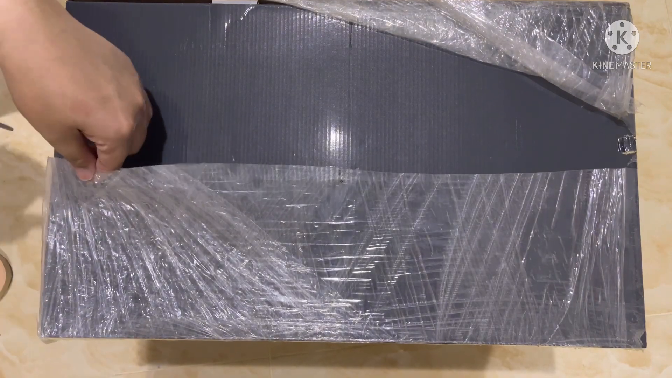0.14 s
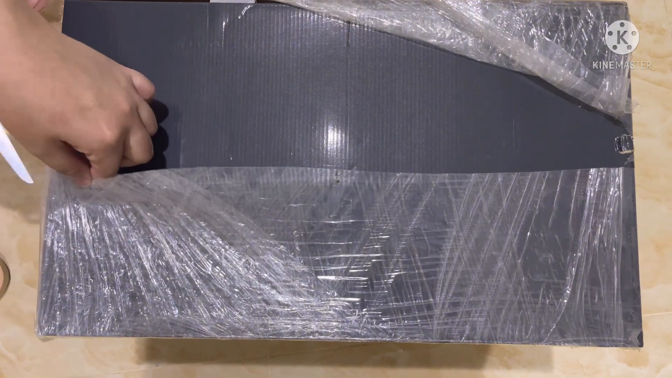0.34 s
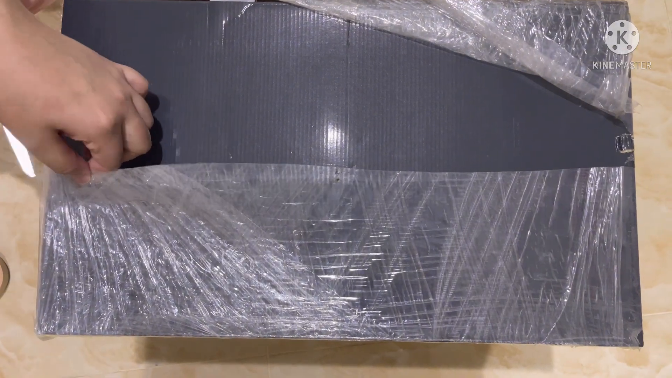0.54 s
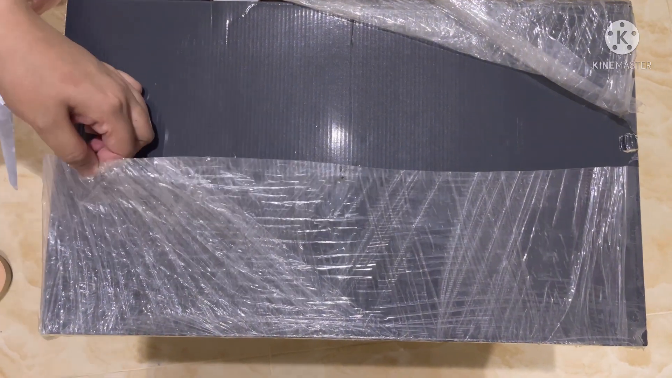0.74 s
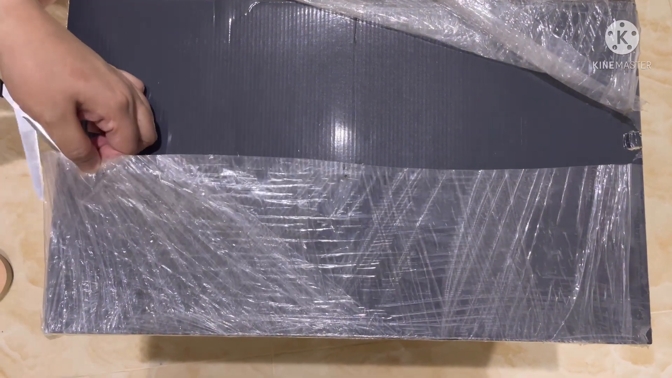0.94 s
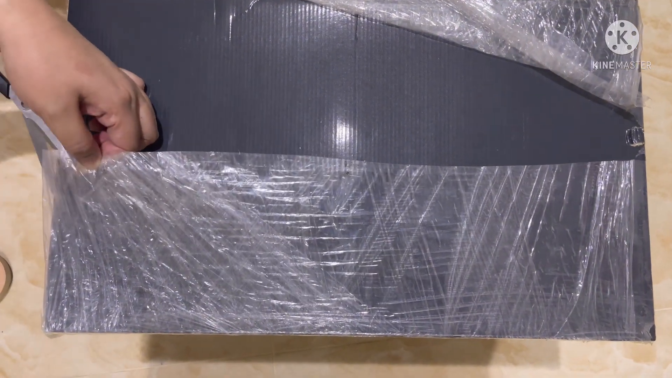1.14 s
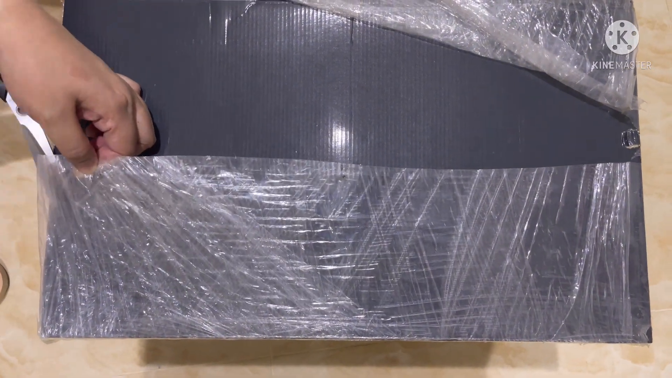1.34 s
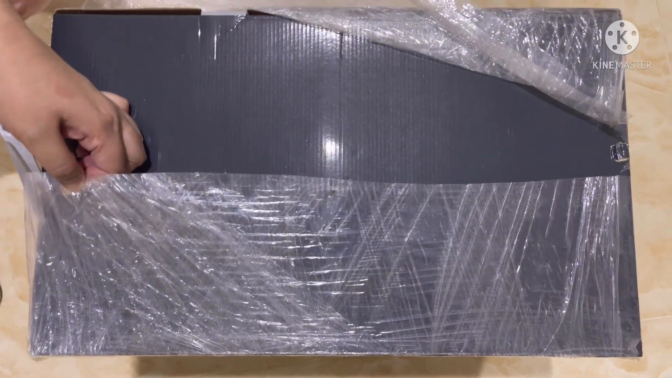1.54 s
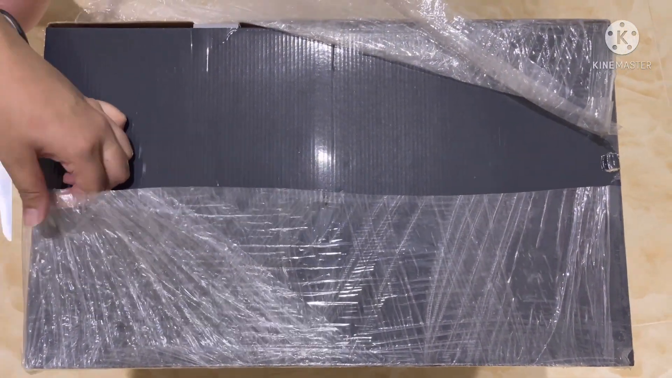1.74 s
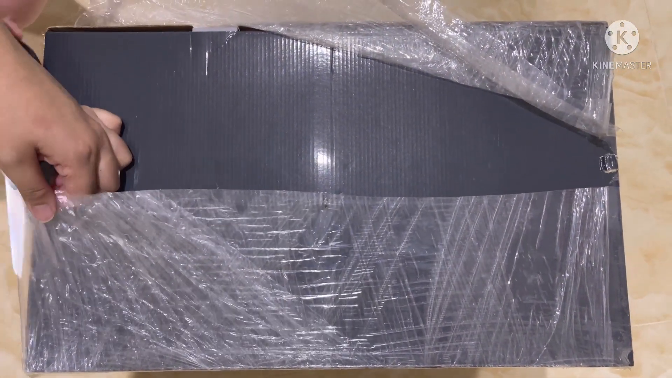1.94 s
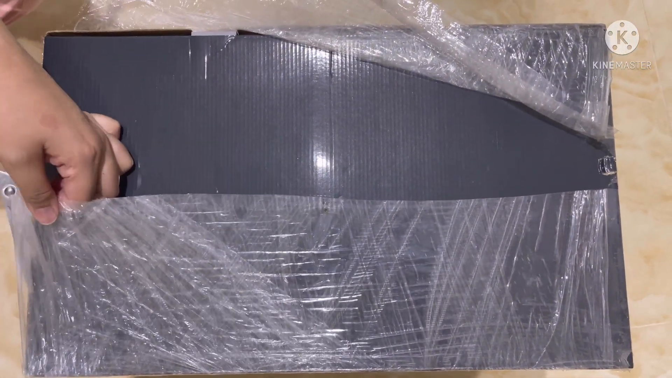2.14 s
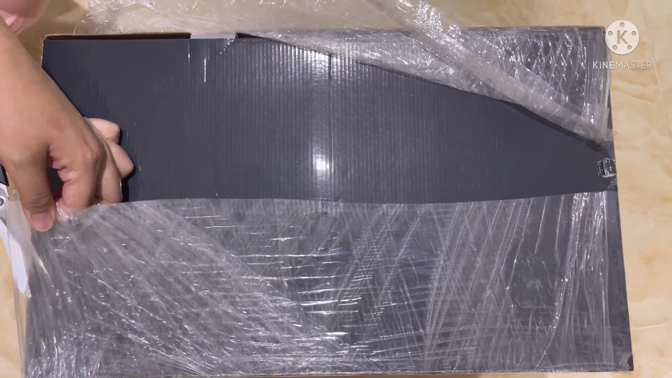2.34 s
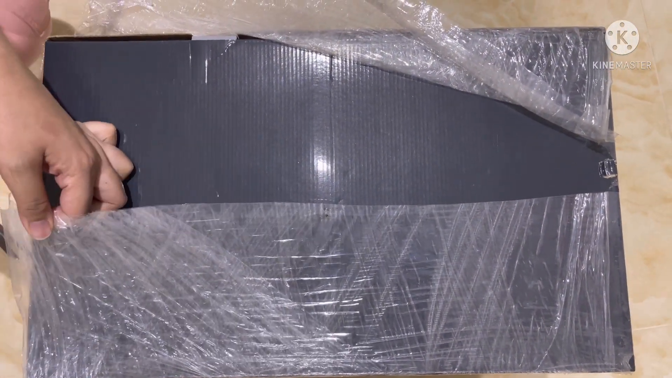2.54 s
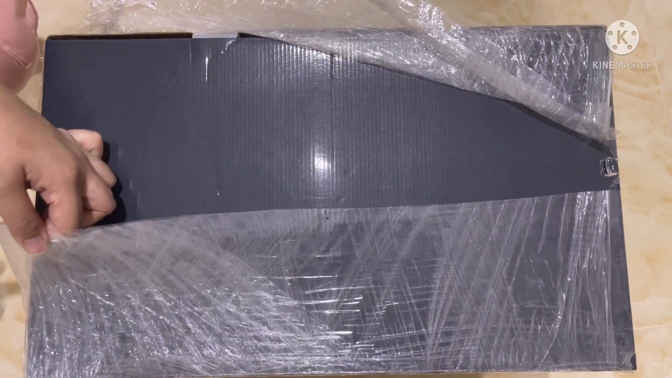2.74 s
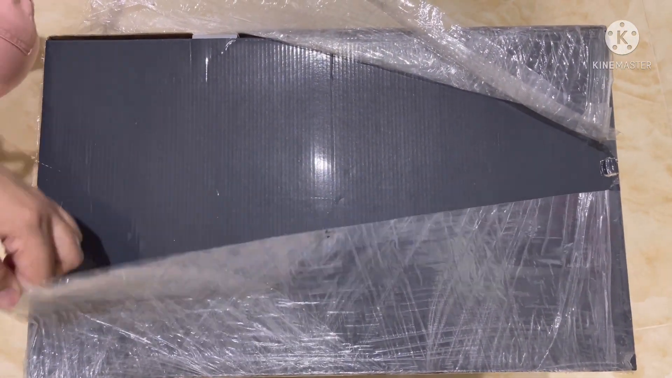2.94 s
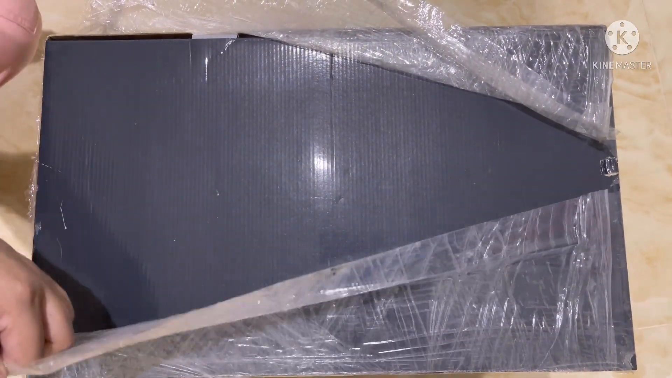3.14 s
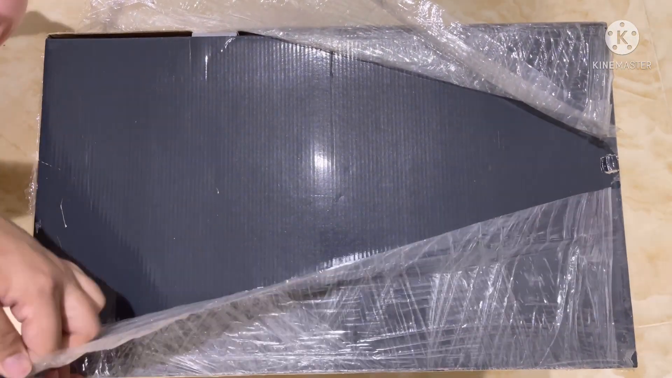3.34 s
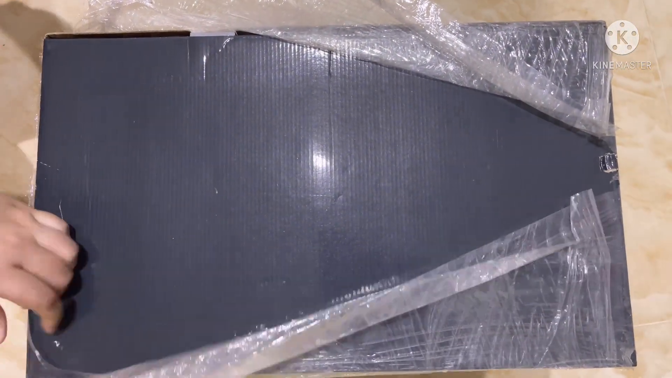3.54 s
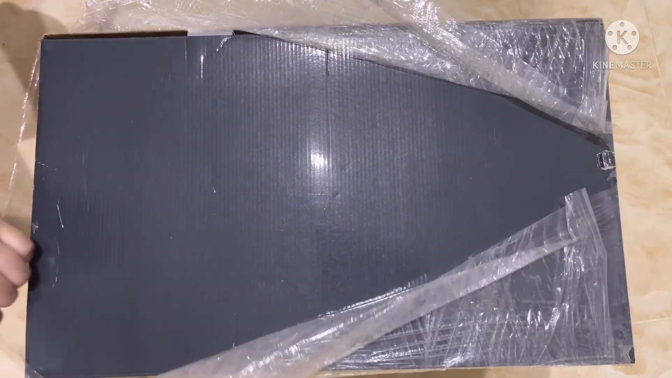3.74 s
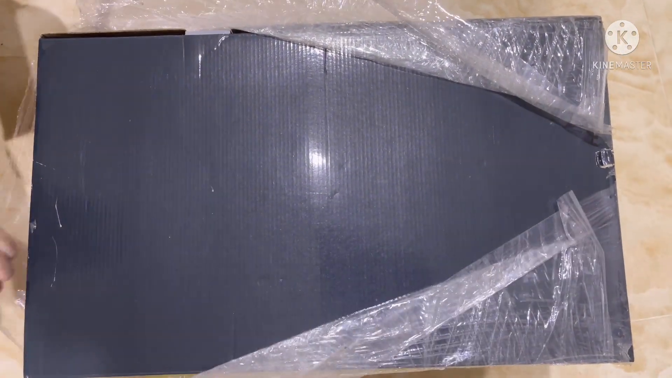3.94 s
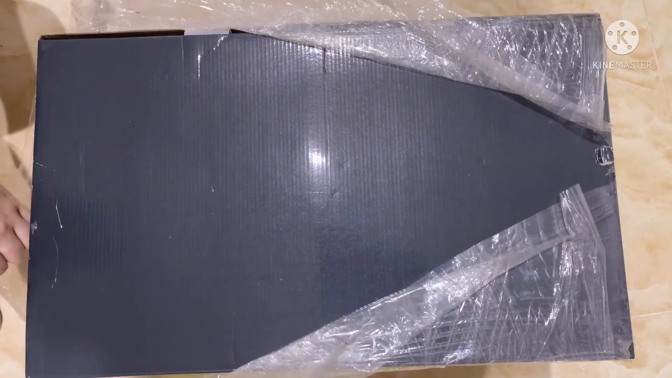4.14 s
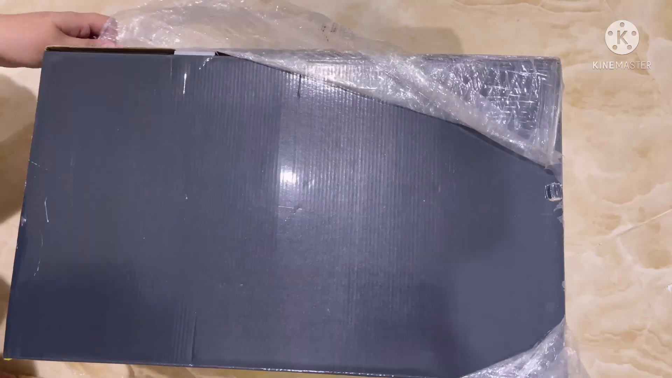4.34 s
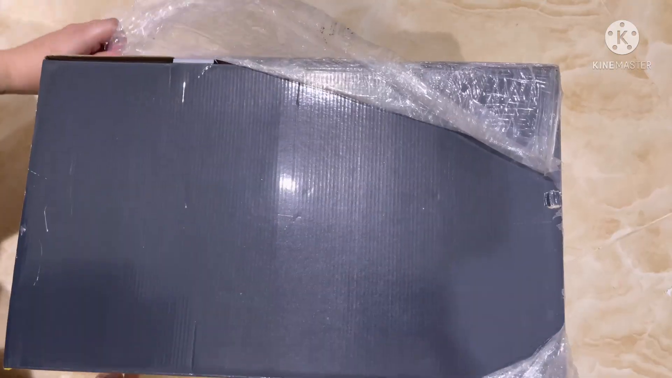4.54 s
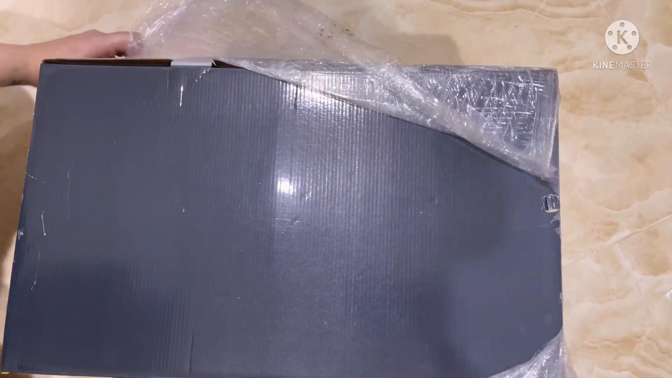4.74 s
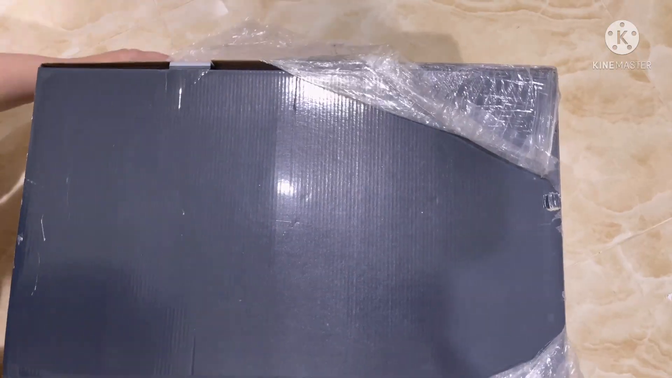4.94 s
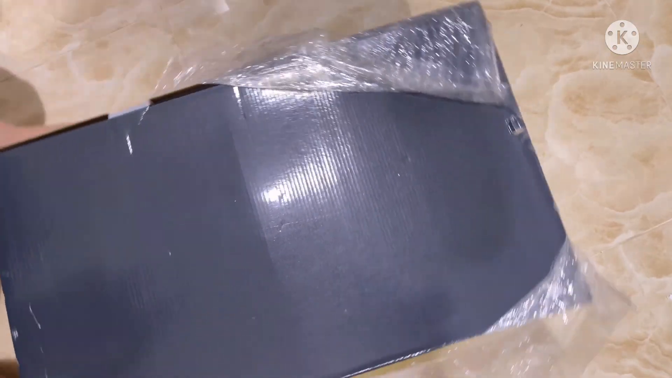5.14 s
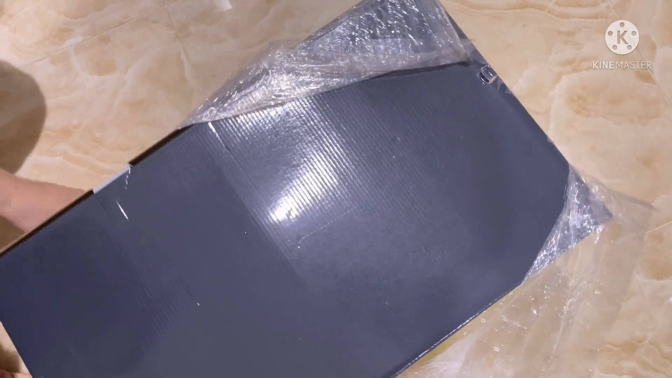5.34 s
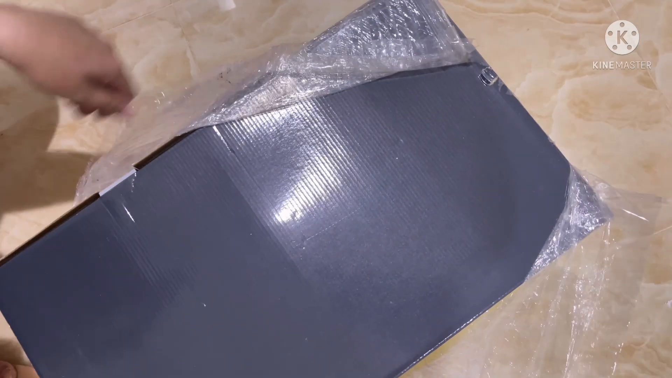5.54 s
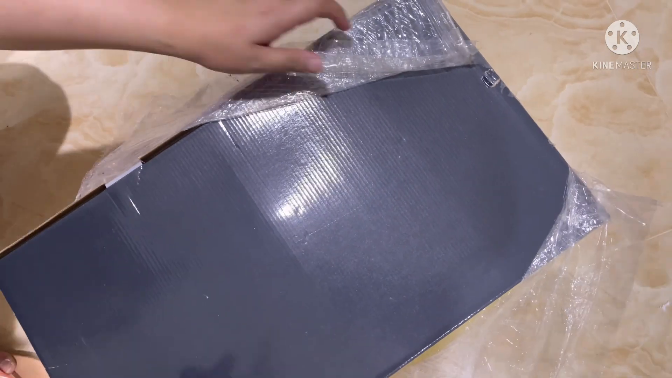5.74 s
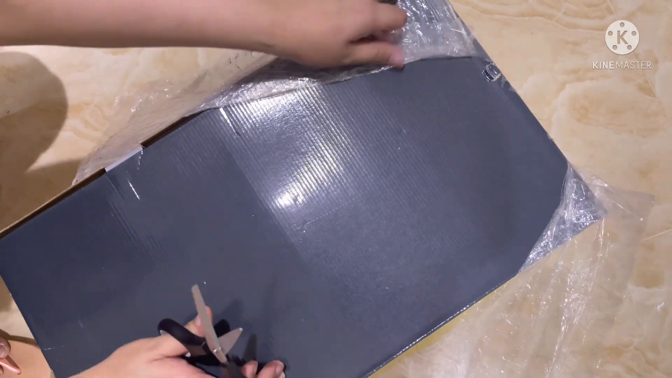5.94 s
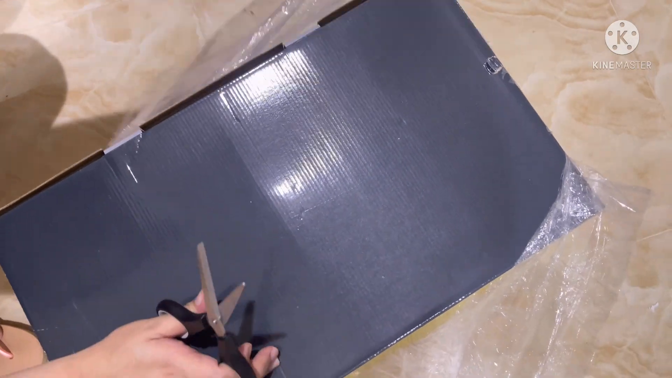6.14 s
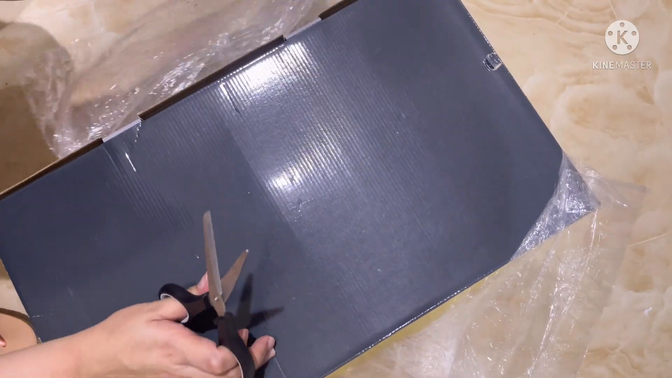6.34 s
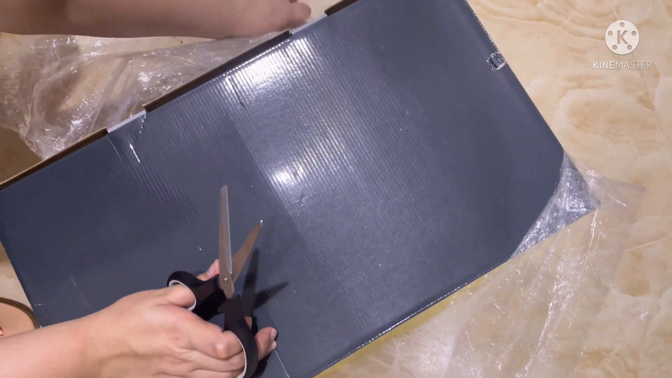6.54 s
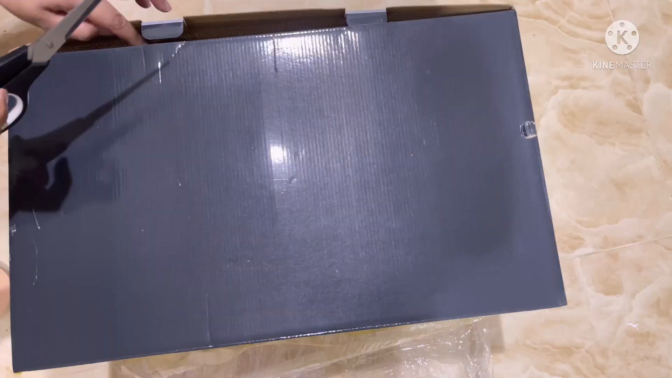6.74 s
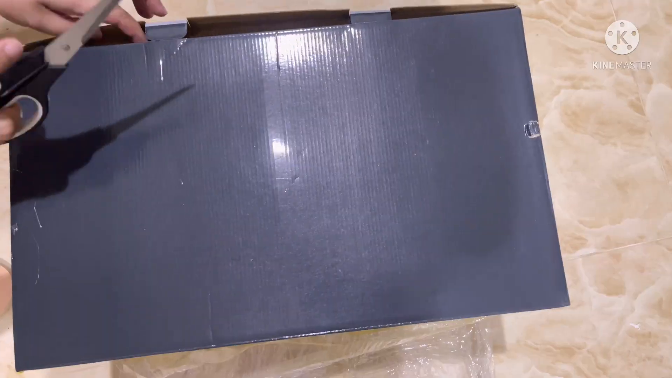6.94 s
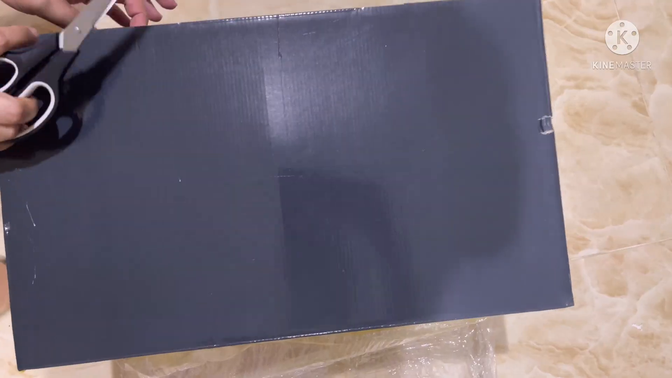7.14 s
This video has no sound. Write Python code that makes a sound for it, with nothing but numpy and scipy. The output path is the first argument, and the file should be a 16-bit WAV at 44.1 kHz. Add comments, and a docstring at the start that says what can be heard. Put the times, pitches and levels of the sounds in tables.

```python
"""Stretch wrap on a hollow box

Stretch wrap is pulled, snipped and peeled off a hollow box in a tiled room, in three passages joined by fades.
Buckling creases make dense crackle and lone snaps, as random clicks that ring and as bursts of dying noise.
Sticking film drums on the box and blows make it thud, both through damped wall modes; the room hums below.
Two close microphone ports hear it all with a phase turn between them.
"""
import sys
import numpy as np
from scipy import signal
from scipy.fft import rfft, irfft, next_fast_len
from scipy.io import wavfile

SR = 44100
rng = np.random.default_rng(int(sys.argv[2]) if len(sys.argv) > 2 else 0)


def to_wav(sig):
    """Store sig (one row per channel, or 1-D mono) as 16-bit WAV at the path in sys.argv[1].

    Samples outside -1..1 are clipped; the rate is SR.
    """
    pcm = np.clip(np.atleast_2d(sig), -1, 1) * 32767
    pcm = np.round(pcm).astype(np.int16)
    wavfile.write(sys.argv[1], SR, pcm.T)  # frames by channels


N = 321489


def from_db(db):
    """Level law: decibels to amplitude gain."""
    return 10 ** (np.asarray(db) / 20)


def rms_one(x):
    """Power normalisation: scale to rms 1."""
    return x / np.sqrt(np.mean(x ** 2) + 1e-20)


def in_time(rows):
    """Linear interpolation: the columns of a curve, one value a sample."""
    s, *columns = np.transpose(rows)
    return [np.interp(np.arange(N) / SR, s, c) for c in columns]


def at_hz(rows, hz):
    """Logarithmic pitch scale: the columns of a table interpolated over log frequency."""
    at, *columns = np.transpose(rows)
    return [np.interp(np.log(np.maximum(hz, 1)), np.log(at), c) for c in columns]


def coloured(x, spectrum):
    """Spectral shaping: weight x by the curve (frequency [Hz], gain [dB])."""
    size = next_fast_len(N + SR // 2)
    hz = np.arange(size // 2 + 1) * SR / size
    gain = from_db(at_hz(spectrum, hz)[0])
    return irfft(rfft(x, size) * gain, size)[..., :N]


def drift(corner_hz):
    """Low-passed noise: a slow random wander of rms 1, computed every 40 samples."""
    r = np.exp(-80 * np.pi * corner_hz / SR)
    noise = rng.standard_normal(N // 40 + 2002)
    slow = signal.lfilter([1], [1, -2 * r, r * r], noise)[2000:]
    return np.interp(np.arange(N) / 40, np.arange(len(slow)), rms_one(slow))


def ring(clicks, hz, t60):
    """Damped resonance: a unit click sets a cosine of height 1 ringing; no steady push passes."""
    r, w = from_db(-60 / (t60 * SR)), 2 * np.pi * hz / SR
    return signal.lfilter([.5, 0, -.5], [1, -2 * r * np.cos(w), r * r], clicks + 1e-18)


def clicks_at(per_s, spread_db):
    """Shot noise: random uneven clicks of like power at any rate; two rows with unrelated signs."""
    sizes = from_db(spread_db * np.minimum(rng.exponential(1, N), 4.5))
    signed = sizes * rng.choice([-1, 1], (2, N))
    return signed * (rng.random(N) < per_s / SR) / np.sqrt(per_s)


# spectrum of the room's air and machinery: (frequency [Hz], relative density [dB])
AIR_SPECTRUM = [(15, -42), (25, -21), (55, 3), (103, -10), (203, -9.5), (370, -5), (507, -14.5), (975, -19),
                (2190, -26.5), (3700, -30.5), (4940, -35), (6090, -40), (10500, -26.5), (11700, -55),
                (13000, -59)]
# the room's low resonances, standing out of the hum: (frequency [Hz], level [dB], t60 [s])
DRONES = [(59.3, -56.5, 0.58), (100.4, -52.5, 0.4), (115.7, -53.5, 0.54), (153, -66.5, 0.097),
          (306.4, -59.5, 0.53), (353.3, -59, 0.097)]
AIR_DB = -48


def hum():
    """Filtered noise and room modes: steady air and distant machinery, wavering a little, with drones."""
    noise = rng.standard_normal((2, N))
    air = from_db(AIR_DB + 0.4 * drift(13.0)) * rms_one(coloured(noise, AIR_SPECTRUM))
    stir = rng.standard_normal((2, N))
    return air + sum(from_db(db) * rms_one(ring(stir, hz, t60)) for hz, db, t60 in DRONES)


# steady tension of the hands on the film, before each layer's trim:
# (time [s], fine crackle [dB], coarse crackle relative to fine [dB], box drumming [dB])
TENSION = [(0, -54.5, 2, -63), (.5, -61, 7, -49.5), (.8, -64.5, -9, -51), (1.4, -72.5, 9, -53),
           (1.7, -45, 0.5, -48), (2.3, -55.5, 5.5, -52.5), (2.6, -44.5, -7, -46.5), (2.84, -60, 6.5, -47),
           (2.96, -32, -8.5, -47.5), (3.45, -36, -3.5, -44), (3.7, -28.5, -7.5, -38),
           (4.0, -33.5, 1, -33.5), (4.2, -25.5, -1, -26.5), (4.4, -32.5, -3, -42.5),
           (4.7, -33.5, -7, -41.5), (4.95, -36, -1.5, -39), (5.15, -36.5, -9.5, -43.5),
           (5.5, -50, -3, -52.5), (5.85, -57, -7, -49.5), (6.2, -25, -2.5, -35), (6.4, -27, -7.5, -36.5),
           (6.58, -43.5, -6, -45.5), (6.9, -57, 1, -48.5), (7.29, -70, -24, -50)]
# pulls and folds, before each layer's trim:
# (start [s], hold [s], fine crackle [dB], coarse crackle relative to fine [dB], box drumming [dB])
PULLS = [(0.052, 0.15, -46.5, 3.5, -49.5), (0.236, 0.023, -49, 9, -56), (0.32, 0.0068, -56, -21, -33),
         (0.44, .01, -53.5, -17, -62), (0.525, 0.006, -52.5, 6.5, -67), (0.625, 0.14, -46, 2, -50),
         (0.861, 0.053, -49, 6, -43.5), (1.206, 0.0049, -29.5, -20, -49), (1.263, 0.0098, -45.5, -17, -54),
         (1.452, .01, -56.5, 10.5, -51.5), (1.613, 0.0064, -41.5, -24, -46.5),
         (1.913, 0.085, -36.5, 5.5, -37.5), (2.092, 0.016, -32.5, -4.5, -43),
         (2.205, 0.0059, -36, -6.5, -51), (2.412, 0.033, -45, -1, -44), (2.686, 0.016, -49.5, 2.5, -42.5),
         (2.877, 0.039, -42.5, 1.5, -46), (3.057, 0.04, -45.5, 9, -51), (3.331, 0.031, -29, -32.5, -46),
         (3.489, 0.0076, -25.5, -7.5, -35.5), (3.525, 0.016, -23, -9, -35), (3.545, 0.0094, -21.5, 2, -35),
         (3.601, 0.021, -31, 2.5, -32.5), (3.824, 0.036, -21.5, -6, -41.5), (3.853, 0.059, -19.5, -11, -34),
         (4.019, 0.0053, -30.5, -9, -36.5), (4.035, 0.0052, -19, -9.5, -32), (4.083, 0.068, -14, -5, -22.5),
         (4.146, 0.0066, -15.5, -11.5, -35.5), (4.166, 0.035, -16, -1.5, -28),
         (4.209, 0.022, -23, -1.5, -30), (4.44, 0.07, -35, -4, -57), (4.727, 0.0047, -38.5, -1, -34),
         (4.786, 0.1, -24.5, -6.5, -37.5), (4.866, 0.017, -20.5, -9.5, -18.5),
         (5.227, 0.21, -34, -13.5, -47), (5.382, 0.075, -32.5, 0, -38.5), (5.971, 0.12, -29.5, 2, -41),
         (6.035, 0.1, -20.5, -3.5, -34.5), (6.122, 0.044, -19.5, -17, -29.5), (6.224, 0.03, -29, -14, -43),
         (6.272, .012, -26.5, -18, -24.5), (6.335, 0.033, -30, -10, -32), (6.622, 0.02, -26, -7, -36.5),
         (6.983, 0.06, -39, -0.5, -32), (7.14, 0.034, -49, 4, -35)]
# decay of a pull, one row each for fine crackle, coarse crackle and drumming: (fall [dB/s])
PULL_FALL_DB_PER_S = [
    [224],
    [241],
    [324.5],
]
LONG_PULL_RISE_DB_PER_S = 393  # limit for a long hold
JERK_S = .03   # pulls held for less than about this start much more abruptly


def handling():
    """Power addition: each pull rises fast, holds and dies away, adding to the steady tension."""
    t, (fine, coarse, drum) = np.arange(N) / SR, in_time(TENSION)
    power = from_db(2 * np.array([fine, fine + coarse, drum]))
    for s, hold, fine_db, coarse_db, drum_db in PULLS:
        near = slice(max(round((s - .2) * SR), 0), round((s + .6) * SR))
        early, late = np.maximum(s - t[near], 0), np.maximum(t[near] - s - hold, 0)
        rise_db_per_s = LONG_PULL_RISE_DB_PER_S * (1 + JERK_S / max(hold, .004))
        shape_db = -rise_db_per_s * early - np.array(PULL_FALL_DB_PER_S) * late
        held_db = np.array([[fine_db], [fine_db + coarse_db], [drum_db]])
        power[:, near] += from_db(2 * (shape_db + held_db))
    fine, coarse, drum = 10 * np.log10(power)
    return fine, coarse - fine, drum


# colour of the crackle: (frequency [Hz], relative gain [dB])
FILM_SPECTRUM = [(590, -2), (1000, -11.5), (1350, -11.5), (1840, -7.5), (2450, -5), (2950, -11.5),
                 (3500, -5), (4810, -3), (5920, -2.5), (8060, 0.5), (10600, 8.5), (11600, -1), (12500, -1),
                 (14500, 2)]
# resonances of the taut sheet under the wide folds, before halving and with fine crackle at -23.5 dB:
# (frequency [Hz], level relative to the coarse crackle [dB], t60 [s])
SHEET = [(2920, -7.5, 0.013), (3214, -9, 0.014)]
SHEET_FOLLOWS = 0.1   # the sheet rings more under harder pulls [dB per dB]
CREASES_PER_S, BUSIER = 1500, .45   # mean rate at -45 dB; its growth under harder pulling [dB per dB]
PATCHY_DB, PATCH_HZ = 4.5, 22   # creases of like width come in patches, so the colour keeps changing


def crackle(fine_db, coarse_db):
    """Shot-excited resonance: buckling creases ring a few cycles, in clumps; wide ones ring lower."""
    per_s = CREASES_PER_S * from_db(BUSIER * (fine_db + 45.0) + 4.0 * drift(25))
    clicks, dealt = clicks_at(per_s, spread_db=2.6), rng.integers(0, 20, N)
    together = drift(35)
    pitches = np.geomspace(1200, 13000, num=20)
    patches = [from_db(PATCHY_DB * drift(PATCH_HZ)) for _ in range(7)]
    rings = []
    for k, hz in enumerate(pitches):
        buckles = clicks * (dealt == k) * patches[k // 3]
        rings.append(ring(buckles, hz, 2.44 / hz) * np.sqrt(hz))
    coarse = rms_one(coloured(sum(rings[:12]), FILM_SPECTRUM))
    fine = rms_one(coloured(sum(rings[12:]), FILM_SPECTRUM))
    sheet = 0
    for hz, db, t60 in SHEET:
        sheet_db = db + SHEET_FOLLOWS * (fine_db + 23.5) + 2.94 * drift(27)
        sheet = sheet + from_db(sheet_db) * rms_one(ring(coarse, hz, t60))
    # wide folds come and go on their own
    coarse = (coarse + sheet / 2) * from_db(coarse_db - 1.5 + 1.58 * drift(29))
    return from_db(fine_db - 1.5 + 0.67 * together) * (fine + coarse)


# damped wall modes of the box, t60 before the hand's damping; the knocks use them too:
# (frequency [Hz], relative level [dB], undamped t60 [s])
BOX = [(106, -0.5, 0.23), (150, -3, 0.13), (224, 3.5, 0.069), (290.4, -3, 0.099), (328, -1, 0.059),
       (450, 2, 0.051), (573, 3, 0.018), (758, -4, 0.044), (994, -3.5, 0.036), (1137, -3, 0.027),
       (1533, -10, 0.049), (2010, -3.5, 0.011)]
TUGS_PER_S, WALL_WANDER_DB = 1800, 2.5   # centre of a wandering rate; spread of each mode's level


def drumming(level_db):
    """Stick-slip: film tugs at one hand-damped wall after another; hard pulling favours high modes."""
    tugs = clicks_at(TUGS_PER_S * from_db(3.0 * drift(17)), spread_db=2.5)
    dealt = rng.integers(0, len(BOX), N)
    tilt_db_per_octave = 2.5 + 0.065 * (level_db + 45.0)
    walls = 0
    for k, (hz, db, t60) in enumerate(BOX):
        mode_db = db + tilt_db_per_octave * np.log2(hz / 300) + WALL_WANDER_DB * drift(5.2)
        walls = walls + from_db(mode_db) * ring(tugs * (dealt == k), hz, 0.27 * t60)
    return from_db(level_db - 4.0 + 2.0 * drift(10.7)) * rms_one(walls)


SMALL_SNAPS = 170
# centre level above the fine crackle (before the snap trim), top pitch, centre coarse part
SMALL_SNAP_DB, SMALL_SNAP_TOP_HZ, SMALL_SNAP_COARSE_DB = 14.5, 10000, -7


def small_snaps(fine_db):
    """Random point process: rows of lesser snaps at chance moments, above the crackle around them."""
    when, size, pitch, colour = rng.random((SMALL_SNAPS, 4)).T
    level_db = fine_db[(when * N).astype(int)] + SMALL_SNAP_DB + 5.2 * (size - .5)
    pitch_hz = SMALL_SNAP_TOP_HZ * (1 - .3 * pitch ** 2)
    coarse_db = SMALL_SNAP_COARSE_DB + 6.5 * (colour - .5)
    return list(zip(when * N / SR, level_db, pitch_hz, coarse_db))


# lone creases, levels before the trims in snaps():
# (time [s], peak level [dB], pitch [Hz], coarse part relative to fine [dB])
SNAPS = [(.0203, -20, 7300, 1), (.0525, -20, 10850, -1), (.101, -13.5, 10250, -6), (.1257, -17, 10600, -9),
         (.232, -28, 3200, 3), (.2365, -21.5, 3200, 6), (.3228, -20, 3900, -1), (.445, -34, 8000, -12),
         (.532, -26, 7520, -23), (.6302, -20.5, 5840, 1), (.658, -17.5, 5870, 4), (.6924, -18.5, 9410, -28),
         (.7636, -16, 10500, -6), (.7815, -34, 6000, -10), (.801, -38, 9000, -10), (.8173, -21, 5500, -14),
         (.8506, -21, 10250, -1), (.8695, -22, 7000, 2), (.8808, -10.5, 8200, -5.5), (.915, -22, 7500, 1),
         (.993, -18.5, 6370, -20), (.9955, -19, 6000, -6.5), (1.0135, -22, 10620, 1),
         (1.0574, -24, 10140, -5), (1.0645, -28, 3000, 7.5), (1.088, -23.5, 2930, 7),
         (1.0945, -25, 9030, -15), (1.101, -17, 10080, -11), (1.107, -31, 3000, 10),
         (1.1422, -18, 8350, -4), (1.1579, -27.5, 3240, 10), (1.1644, -35, 9000, -12),
         (1.1718, -23, 10340, -15), (1.188, -23, 10500, 4), (1.195, -32, 10000, 10.5),
         (1.2042, -16.5, 4520, 1), (1.209, -23, 9000, -12), (1.2123, -12, 10270, -30),
         (1.2582, -15, 9500, -9.5), (1.2654, -18.5, 9070, -13), (1.374, -25.5, 10420, -26),
         (1.398, -37, 8000, 2.5), (1.4155, -26, 9000, -4), (1.425, -44, 5860, -9),
         (1.4444, -24, 6500, -27.5), (1.4508, -42.5, 7000, 0), (1.468, -31, 9050, -11),
         (1.4937, -21.5, 9500, -10.5), (1.523, -35, 10530, -19), (1.538, -9.5, 10500, -54),
         (1.5682, -22, 7450, -18.5), (1.6155, -14, 7000, -9), (1.6222, -22.5, 7500, -23.5),
         (1.6249, -3.5, 7000, -4), (1.6252, -9.5, 3480, 17), (1.7724, -12.5, 10600, 1),
         (1.8244, -23.5, 2200, 17), (1.8443, -21, 10360, -17), (1.872, -16.5, 10470, -4),
         (1.9137, -13.5, 10270, -14), (1.9211, -15, 2000, -4), (1.9411, -8, 2090, 0),
         (1.982, -10, 9670, -10), (2.0069, -19, 10620, -22), (2.0186, -10, 7000, -23),
         (2.0927, -29, 2220, 5), (2.1552, -20, 9800, -3), (2.1806, -22, 9000, -1), (2.2057, -17, 8400, 0),
         (2.3172, -22.5, 9930, 2), (2.3519, -10.5, 10230, -12), (2.5365, -25.5, 7820, -14),
         (2.6904, -25, 6000, 6), (2.645, -28, 4500, -4.5), (2.713, -25.5, 1500, 4), (2.803, -30, 4500, 0),
         (2.8294, -24.5, 10660, -8), (2.879, -23, 9220, -17), (2.895, -27, 3600, 4), (2.915, -26, 1300, 2),
         (2.9458, -16, 10770, -21), (2.9767, -19.5, 9900, -23), (3.027, -13.5, 10080, -29),
         (3.0828, -16, 2660, -2), (3.144, -32, 6800, -6), (3.1755, -12.5, 10730, -14),
         (3.1965, -15.5, 3000, 6), (3.2535, -21.5, 4300, 6.5), (3.2687, -9, 7000, -4.5),
         (3.294, -10.5, 6900, 4), (3.312, -38, 8000, -3), (3.4459, -27, 9000, -5),
         (3.4683, -15.5, 9000, -8.5), (3.4888, -7.5, 9700, -5.5), (3.5127, -6.5, 8000, -19.5),
         (3.54, -24, 9000, -17), (3.5493, -0.5, 9700, -2.5), (3.556, -4.5, 9100, -9), (3.6, -14, 2980, 3.5),
         (3.6277, -10.5, 10900, -10), (3.7666, -6.5, 9700, -17.5), (3.8145, -15, 3000, 3.5),
         (3.8232, -3, 9830, 0), (3.8658, 0, 9700, -6), (3.874, -17, 4040, 4), (3.887, -7, 3570, -11),
         (3.913, -8.5, 9000, -5), (3.932, -4, 8700, -5), (4.0217, -6, 8910, 3.5), (4.0355, -11.5, 3500, -7),
         (4.095, -3, 10600, -8), (4.108, -9.5, 9600, 11.5), (4.132, -1.5, 2880, 3), (4.1535, 2, 10250, -12),
         (4.171, 0, 9900, -8), (4.187, -4, 8950, -7), (4.378, -18, 10000, -16), (4.44, -34, 9300, -8),
         (4.5818, -12, 9430, -3), (4.64, -16, 10000, -16), (4.7275, -11.5, 10400, -3.5),
         (4.7879, -10, 10100, -13), (4.801, -17, 1390, 8), (4.8345, -19, 1400, 10),
         (4.8628, -17, 1580, 2.5), (4.885, -8, 4000, 1), (5.055, -31, 10400, 8), (5.0943, -24.5, 10550, 6),
         (5.1618, -17, 6760, -30), (5.2302, -24, 10230, -26), (5.3304, -11.5, 11400, -2.5),
         (5.4645, -16, 7800, -15), (5.858, -48, 1440, 3), (5.9678, -9.5, 11610, -14),
         (5.9774, -10.5, 2960, -9), (5.9915, -16, 5050, -0.5), (6.017, -17, 3000, -0.5),
         (6.045, -7, 10500, -7), (6.054, -11, 9990, -10), (6.082, -9.5, 6470, -2), (6.1, -8.5, 2460, -4.5),
         (6.134, -8, 10380, -3), (6.173, -9, 7000, 2), (6.184, -2.5, 2920, -6), (6.2288, -10, 6000, -7),
         (6.248, -9, 1990, -1), (6.342, -16, 7950, -12), (6.5483, -13, 10590, -6),
         (6.6206, -8, 10310, -7.5), (6.8572, -16.5, 10490, -4.5), (6.9318, -24, 10960, 8),
         (6.9845, -22, 3580, 6), (7.0207, -12, 10920, -26), (7.0269, -11, 3720, 3.5), (7.058, -27, 2000, 6),
         (7.1315, -7.5, 9300, -16), (7.1322, -15, 3150, 16), (7.1345, -11, 3170, 17),
         (7.1365, -17.5, 3140, 23), (7.139, -30, 3100, 20)]
SNAP_T60_S, CREASE_CYCLES = 0.009, 6   # decay of the crack; t60 of the crease's ring in cycles
SNAP_TAIL_DB, SNAP_TAIL_T60_S = -11, .035   # the crease settles after the crack


def snaps(rows):
    """Impulsive buckling: a crack and a spit of dying noise, part of it ringing at the crease's pitch."""
    out, t = np.zeros((2, N + 2000)), np.arange(2000) / SR
    noise = rng.standard_normal((len(rows), 2, 2000))
    fine = signal.butter(2, [5200, 12500], "band", fs=SR, output="sos")
    coarse = signal.butter(2, [750, 4600], "band", fs=SR, output="sos")
    decay = from_db(-60 * t / SNAP_T60_S) + from_db(SNAP_TAIL_DB - 60 * t / SNAP_TAIL_T60_S)
    for (s, peak_db, hz, coarse_db), n in zip(rows, noise):
        spit = (n + 1.7 * (t == 0)) * decay
        low = signal.sosfilt(coarse, spit) + .3 * ring(spit, 3150, 0.0011)   # the taut sheet rings briefly
        burst = signal.sosfilt(fine, spit) + from_db(coarse_db - 3.0) * low
        tone = ring(burst, min(hz, 14000), CREASE_CYCLES / hz)
        snap = burst / abs(burst).max() + 0.5 * tone / abs(tone).max()
        out[:, round(s * SR):][:, :2000] += from_db(peak_db - 3.5) * snap / abs(snap[0]).max()
    return out[:, :N]


# knocks on the box, levels before the trim in knocks():
# (time [s], peak level [dB], pitch of the struck wall [Hz], softness: loss away from it [dB/octave])
KNOCKS = [(0.3229, -18.5, 500, 2), (0.324, -20, 168, 11), (0.691, -26.5, 162, 35), (0.882, -28, 1500, 14),
          (0.914, -26, 1300, 10), (0.932, -26, 1200, 8), (1.6251, -7, 1490, 6.5), (2.7, -28, 500, 6),
          (3.4913, -17.5, 800, 10), (3.5159, -23, 250, 9), (3.526, -19, 330, 13), (3.556, -13.5, 750, 20),
          (3.6192, -22, 600, 3), (3.629, -19.5, 605, 6), (3.694, -22, 900, 14), (3.8135, -23, 760, 7.5),
          (3.823, -23, 400, 4.5), (3.851, -18, 1170, 18), (3.866, -23.5, 600, 2.5),
          (3.929, -14.5, 416, 10.5), (4.022, -22, 483, 6), (4.0345, -12, 600, 12), (4.056, -22, 480, 13),
          (4.093, -6.5, 400, 9.5), (4.121, -17, 480, 14), (4.1325, -3.5, 450, 5), (4.147, -20, 350, 6.5),
          (4.187, -17, 298, 8.5), (4.449, -19.5, 380, 5.5), (4.7288, -27, 450.0, 15),
          (4.7887, -13.5, 900, 11), (4.853, -24, 880, 15), (4.8614, -5, 297, 0.5), (4.877, -12, 221, 11),
          (4.883, -15, 800, 5), (4.889, -17, 300, -9), (4.904, -18, 350, 2), (5.1252, -23, 262, 2),
          (5.858, -13.5, 332, 3), (6.029, -20, 1000, 8), (6.056, -16, 1200, 8), (6.084, -16.5, 233, 14),
          (6.089, -21.5, 420, -2), (6.097, -15, 1100, 2), (6.132, -13, 263, 13), (6.1626, -15, 265, 20),
          (6.1824, -15, 1510, 11), (6.229, -14, 990, 16), (6.246, -11, 925, 14), (6.2662, -13, 450, -0.5),
          (6.3313, -17, 239, 12), (6.6158, -24, 256, -2), (6.8573, -23.5, 287, 6), (7.009, -16.5, 410, 9),
          (7.029, -17, 1050, 22), (7.033, -16, 187, 2), (7.055, -19.5, 750, 19), (7.133, -12.5, 428, 15),
          (7.139, -10, 150, 12), (7.164, -19, 150, 6)]
SWEEP_CYCLES, SWEEP_START_S = 2.191, 0.000795   # bending wave: pitch = cycles / (time + start)
SWEEP_DB, SWEEP_T60_S = 7, 0.082
SWEEP_NARROW_DB = 7   # extra loss away from the struck pitch [dB/octave]
RING_ON = 0.95   # share of the walls' ring time left under the hand


def knocks():
    """Dispersion and modal ringing: a blow's bending wave falls in pitch; rough contact rings the walls."""
    out, t = np.zeros((2, N + 8000)), np.arange(8000) / SR
    rough = rng.standard_normal((len(KNOCKS), 2, 8000))
    falling_hz = SWEEP_CYCLES / (t + SWEEP_START_S)
    wave = np.sin(2 * np.pi * np.cumsum(falling_hz) / SR) * from_db(SWEEP_DB - 60 * t / SWEEP_T60_S)
    for (s, peak_db, struck_hz, soft_db), n in zip(KNOCKS, rough):
        contact = ((t == 0) + .05 * n) * from_db(-60 * t / .018)
        thud = 0
        for hz, db, t60 in BOX:
            late = np.roll(contact, round(.6 * SR / hz), axis=1)   # the lows arrive last
            mode_db = db - soft_db * abs(np.log2(hz / struck_hz))
            thud = thud + from_db(mode_db) * ring(late, hz, RING_ON * t60)
        narrow_db = max(soft_db, 0) + SWEEP_NARROW_DB
        sweep = wave * from_db(-narrow_db * abs(np.log2(falling_hz / struck_hz)))
        thud = thud / abs(thud[0]).max() + sweep
        out[:, round(s * SR):][:, :8000] += from_db(peak_db - 8.0) * thud / abs(thud[0]).max()
    return out[:, :N]


ROOM_T60_S, ROOM_DB = 0.48, -7
BOX_ROOM_DB = -4   # the box is heard more directly than the film


def echoes(x):
    """Diffuse reverberation: dense bright tile reflections, dying away, with about the power of x."""
    t = np.arange(SR // 2) / SR
    tail = rng.standard_normal((2, len(t))) * from_db(-60 * t / ROOM_T60_S)
    return signal.fftconvolve(x, tail / np.sqrt(np.sum(tail ** 2) / 2), axes=1)[:, :N]


# microphone ports: (frequency [Hz], phase lead of the left in the first passage [rad],
# the same in later passages [rad], likeness [0-1], left minus right [dB])
PORTS = [(90, 0, 0, .99, 1.8), (200, -.15, -.15, .99, 2.3), (380, -.6, -.6, .94, 2.2),
         (520, -.7, -.7, .87, -4), (700, 0, 0, .82, -5.5), (1250, -.3, -.1, .72, -3),
         (2300, 2.9, .4, .5, .3), (3100, .6, .8, .6, -.4), (4200, .6, .6, .6, .4), (4800, 3.1, 3.1, .3, .7),
         (5300, 5, 5, .7, 0), (8000, 4.4, 4.4, .77, .2), (10500, 4.2, 4.2, .9, .3), (11800, 4, 4, .75, .4),
         (12600, 3.3, 3.3, .78, 0)]
FIRST_PASSAGE_ENDS_S = 4.29


def ports(shared, scattered):
    """Coherence and phase: both ports get the shared sound, turned, plus or minus what the case scatters."""
    size = next_fast_len(N + SR // 2)
    *leads, alike, lean_db = at_hz(PORTS, np.arange(size // 2 + 1) * SR / size)
    same = np.sqrt((1 + alike) / 2) * rfft(shared, size)
    other = np.sqrt((1 - alike) / 2) * rfft(scattered, size)
    heard = []
    for lead in leads:
        turn = from_db(lean_db / 2) * np.exp(.5j * lead)   # half to each port, in opposite senses
        pair = np.array([(same + other) * turn, (same - other) / turn])
        heard.append(irfft(pair, size)[:, :N])
    first, later = heard
    # the hands have moved round the box
    return np.where(np.arange(N) < FIRST_PASSAGE_ENDS_S * SR, first, later)


# joins between passages: (sound cut [s], next passage fades in from [s], swell duration [s])
CUTS = [(4.24, 4.308, 0.14), (6.748, 6.797, 0.086)]
# the level sags, drops, lingers faintly, then swells
FADE_OUT_S, FADE_OUT_DB, SHUT_S, SHUT_DB, LINGER_S = 0.15, -8.5, 0.0091, -42, 0.024
FADE_IN_POWER = 2


def fader():
    """Amplitude envelope: at each join the sound sags, shuts, falls silent and swells back."""
    t, gain = np.arange(N) / SR, np.ones(N)
    for cut, back, swell in CUTS:
        sag_db = np.interp(t - cut, [-FADE_OUT_S, 0, SHUT_S], [0, FADE_OUT_DB, SHUT_DB])
        fade_out = from_db(sag_db) * (t < cut + LINGER_S)
        fade_in = np.clip((t - back) / swell, 0, 1) ** FADE_IN_POWER
        gain = gain * (fade_out + fade_in)
    return gain


def scene():
    """Superposition: film and box in the room, over the hum, as a shared and a scattered row."""
    fine_db, coarse_db, drum_db = handling()
    film = crackle(fine_db, coarse_db) + snaps(SNAPS + small_snaps(fine_db))
    box = drumming(drum_db) + knocks()
    room = from_db(ROOM_DB) * echoes(film + from_db(BOX_ROOM_DB) * box)
    return ports(*(film + box + room + hum()))


def record(dry):
    """Band limiting and soft saturation: bass and treble fall off, peaks round, passages fade."""
    dull = signal.sosfilt(signal.cheby2(16, 42, 12750, fs=SR, output="sos"), dry)
    thin = signal.sosfilt(signal.butter(4, 38, "high", fs=SR, output="sos"), dull)
    rounded = .8 * np.tanh(thin / .8)
    top_cut = signal.cheby2(12, 70, 15725, fs=SR, output="sos")
    return signal.sosfilt(top_cut, rounded * fader())


dry = scene()
out = record(dry)
to_wav(out)
```